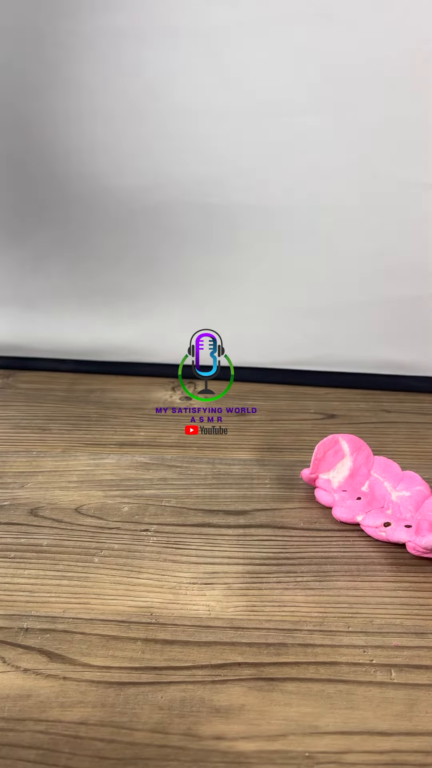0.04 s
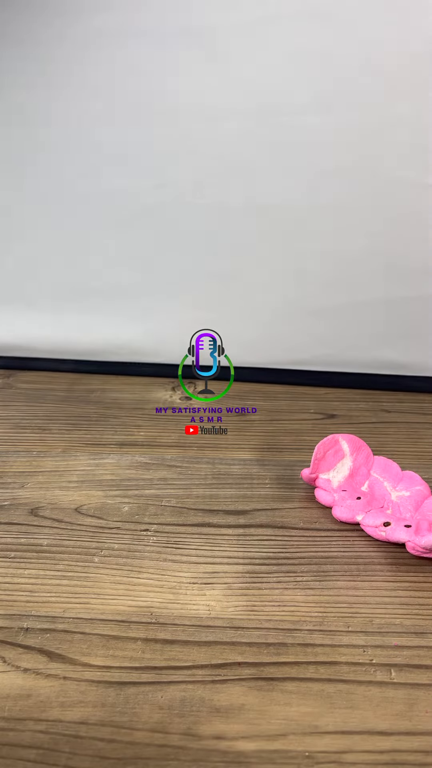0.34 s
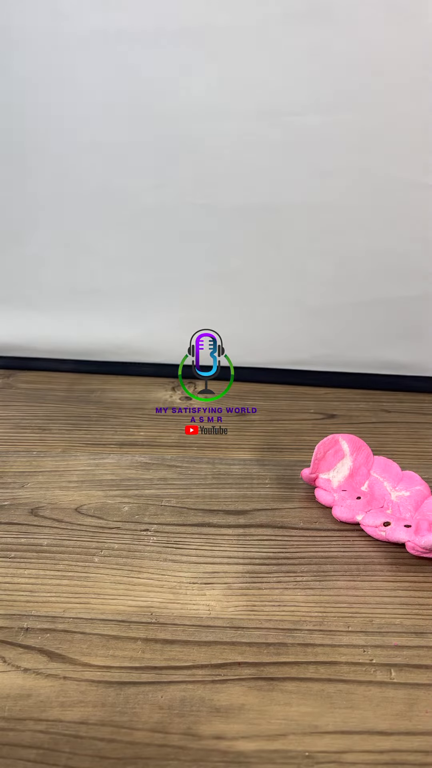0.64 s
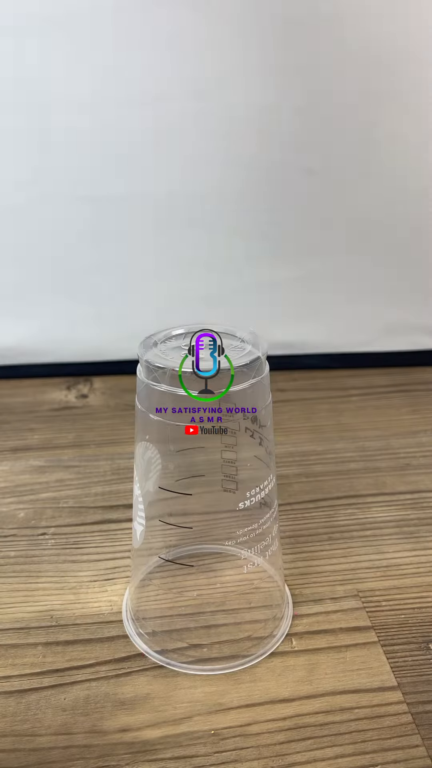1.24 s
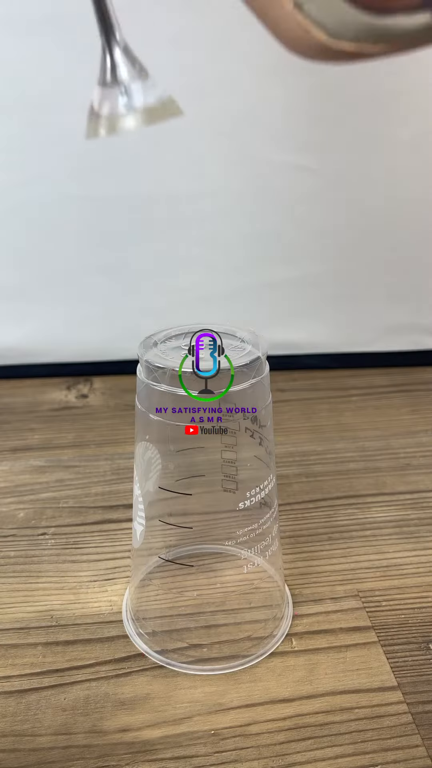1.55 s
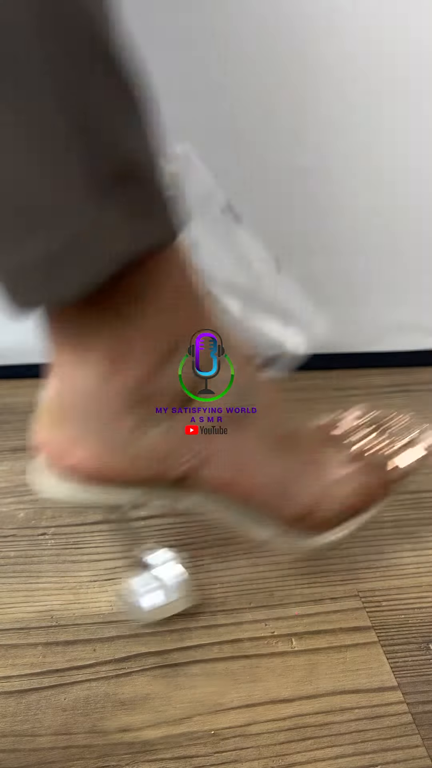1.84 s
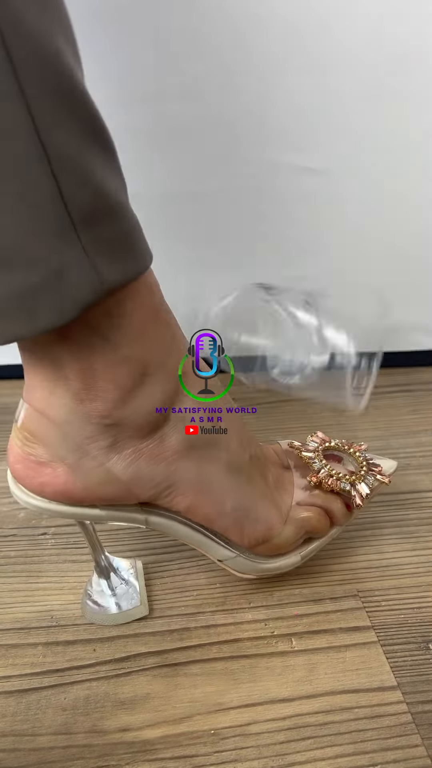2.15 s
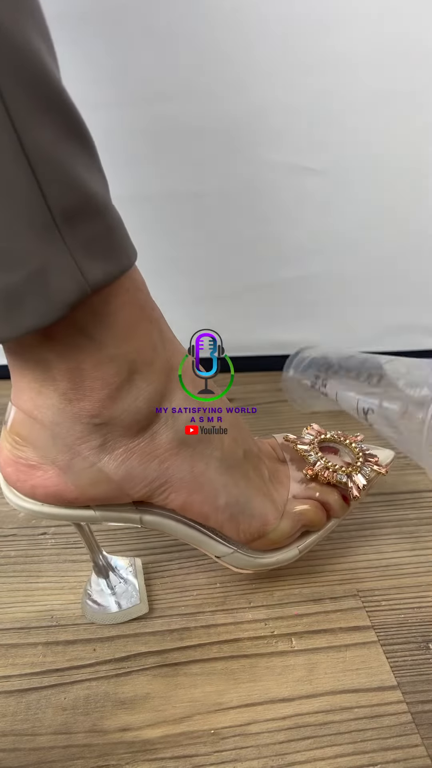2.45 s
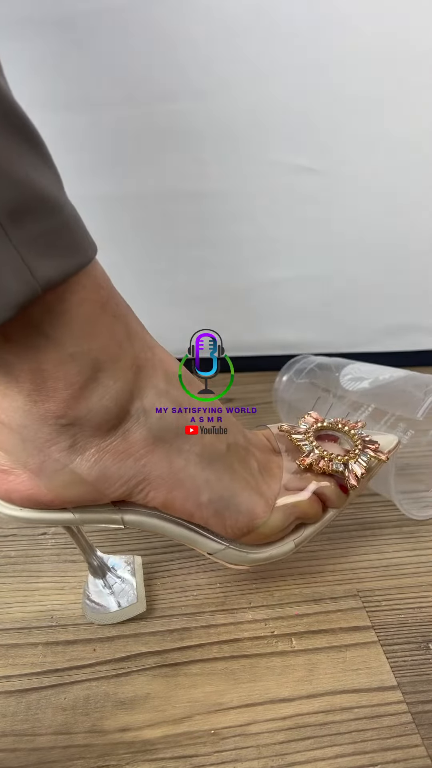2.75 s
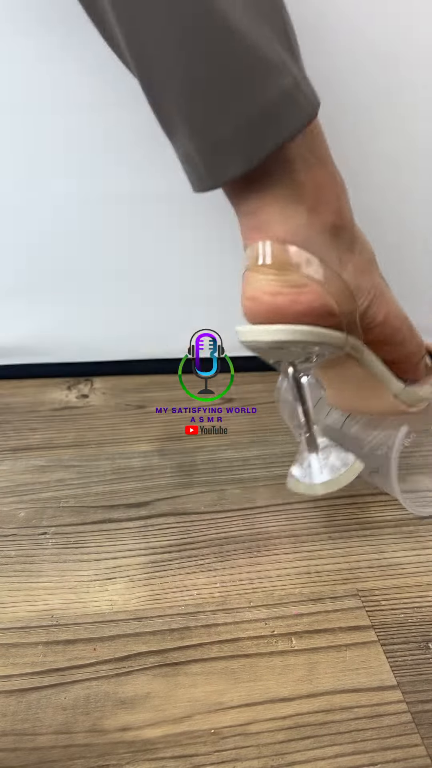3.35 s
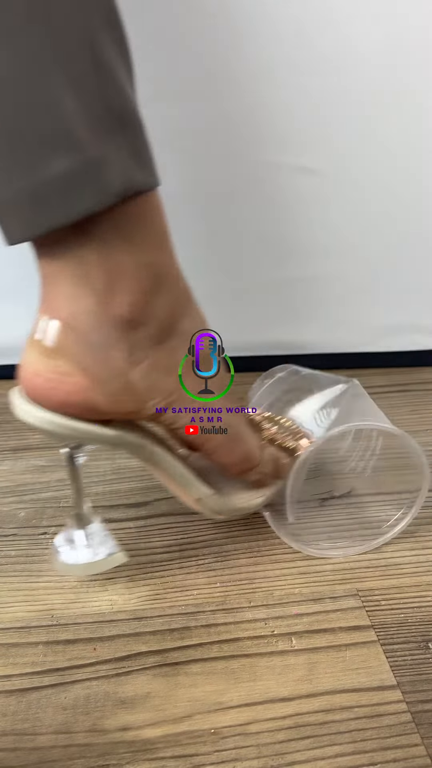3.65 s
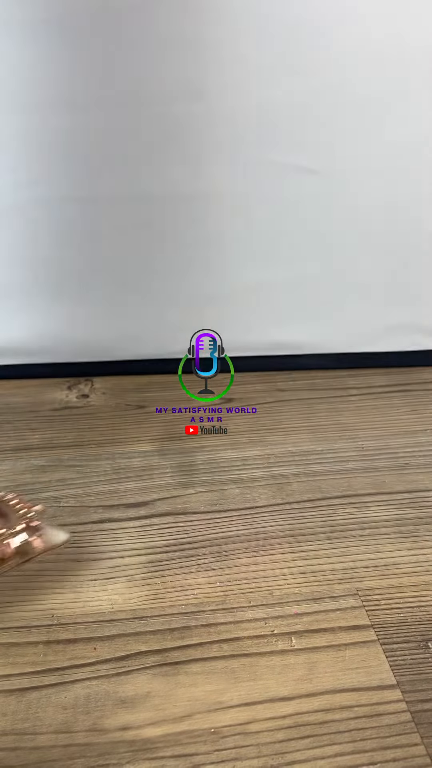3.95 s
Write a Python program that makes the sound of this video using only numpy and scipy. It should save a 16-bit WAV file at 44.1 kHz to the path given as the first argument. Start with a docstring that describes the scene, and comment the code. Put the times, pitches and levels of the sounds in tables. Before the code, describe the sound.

A thin plastic cup crunches under a high heel, bounces away and is crushed again.

```python
"""A high heel stamps on an upturned thin plastic cup on a wooden floor, close to a phone in a small room.
First come a faint rustle, ticks and soft steps; the sound drops out once with a click. Then the cup
buckles in a rush of hollow snaps and crinkles, the loudest overloading the microphone. It springs away,
bounces and rattles to rest. Last, the shoe scuffs and shoves it along the floor, the rim sticking and
slipping on the boards, and crushes it again, the pinched plastic squeaking under the sole."""
import sys
import numpy as np
from scipy import signal
from scipy.fft import rfft, irfft, next_fast_len
from scipy.io import wavfile
from scipy.ndimage import map_coordinates

SR = 44100
rng = np.random.default_rng(int(sys.argv[2]) if len(sys.argv) > 2 else 0)


def transcribe(signal):
    """Save signal, clipped to [-1, 1], as a 16-bit WAV file at the path in sys.argv[1]."""
    frames = np.atleast_2d(signal).T
    limited = np.clip(frames, -1, 1)
    pcm = np.round(limited * 32767).astype(np.int16)
    wavfile.write(sys.argv[1], SR, pcm)


N = 176400

# tone of a bare impact, for blows and creases alike: freq_hz, gain_db
IMPACT_COLOUR = [(50, -3.5), (300, 6.5), (650, 2.5), (1400, 12.5), (2000, -3), (2700, 5.5), (5000, -0.5),
                 (7300, -6), (9500, -18.5), (15500, -35)]


def amp(db):
    return 10 ** (np.asarray(db) / 20)


def unit(x):
    return x / np.sqrt(np.mean(x ** 2) + 1e-20)


def decay(t, t60):
    return np.exp(-np.log(1000) * t / t60)


def along(points, hz):
    """Read (freq_hz, value) points on a log frequency axis."""
    freqs, values = np.transpose(points)
    return np.interp(np.log(hz + 1), np.log(freqs + 1), values)


def curves(rows):
    """One fader curve in dB for each column after the time, silent before the first row."""
    times, *columns = np.transpose(rows)
    return [np.interp(np.arange(N) / SR, times, column, left=-120) for column in columns]


def coloured(x, colour):
    """Equalise x with (freq_hz, gain_db) points, at rms 1."""
    size = next_fast_len(len(x) + 4096)
    gain = amp(along(colour, np.fft.rfftfreq(size, 1 / SR)))
    return unit(irfft(rfft(x, size) * gain, size)[:len(x)])


def add(track, start_s, sound):
    part = track[round(start_s * SR):][:len(sound)]
    part += sound[:len(part)]


def wobble(per_s, size=N):
    """A smooth curve through so many random values a second."""
    return map_coordinates(rng.standard_normal(size // 40), [np.arange(size) * per_s / SR], mode='mirror')


def jerks(per_s, scatter_db):
    """Tiny impulses of uneven size at random moments, at rms 1."""
    moments = rng.random(N) < per_s / SR
    sizes = amp(scatter_db * rng.standard_normal(N))
    return unit(moments * sizes * np.sign(rng.standard_normal(N)))


def in_room(x):
    """Add early echoes from floor and wall, and a fresh diffuse tail that dies faster in the treble."""
    # reverb time of the room: freq_hz, t60_s
    tail_t60 = [(100, 0.66), (400, 0.5), (1500, 0.32), (5000, 0.36), (9000, 0.17), (15000, 0.19)]
    # tone of the tail: freq_hz, gain_db
    tail_colour = [(60, -3.5), (250, -7.5), (700, -2.5), (2000, -1), (6000, -2.5), (14000, 1)]
    tail_db, build_s, echo_db = -12.5, 0.0014, -21.5
    hz, t, spectrum = signal.stft(rng.standard_normal(SR // 2), SR, nperseg=256)
    spectrum = spectrum * decay(t, along(tail_t60, hz)[:, None]) * amp(along(tail_colour, hz))[:, None]
    tail = signal.istft(spectrum, SR, nperseg=256)[1]
    tail *= 1 - np.exp(-np.arange(len(tail)) / SR / build_s)
    response = amp(tail_db) * tail / np.linalg.norm(tail)
    echoes_s = rng.uniform(.002, .018, size=6)
    response[(echoes_s * SR).astype(int)] += amp(echo_db)
    response[0] += 1  # direct sound
    return signal.fftconvolve(x, response)


def background():
    """Quiet room tone and a faint, fluttering rustle with a dull rubbing in it."""
    # low room tone: freq_hz, gain_db
    room_colour = [(24, -19), (60, 0), (556, -10.5), (16000, -33)]
    # swell of the rustle: time_s, hiss_db, rub_db
    rustle_levels = [(0, -52, -64.5), (.35, -66.5, -64), (.58, -62.5, -60), (.85, -71, -77)]
    # tone of its hiss: freq_hz, gain_db
    hiss_colour = [(300, -16.5), (3000, 3), (14000, -18.5)]
    # tone of its rubbing: freq_hz, gain_db
    rub_colour = [(900, -9.5), (1400, 3), (9000, -34)]
    room_tone_db, flutter_db = -57.5, 2
    out = amp(room_tone_db) * coloured(rng.standard_normal(N), room_colour)
    for level_db, colour in zip(curves(rustle_levels), (hiss_colour, rub_colour)):
        out += amp(level_db + flutter_db * wobble(per_s=68)) * coloured(rng.standard_normal(N), colour)
    return out


def ticks():
    """The shoe and the settling plastic tick faintly, each tick one broad, quickly fading resonance."""
    # small ticks: start_s, level_db, pitch_hz, t60_s
    tick_cues = [(.145, -43, 1260, 0.059), (.287, -44, 2900, 0.024), (1.441, -33, 2700, .026)]
    width = 0.053  # share of the pitch
    out, t = np.zeros(N), np.arange(SR // 10) / SR
    for start_s, level_db, pitch_hz, t60_s in tick_cues:
        ring = signal.lfilter(*signal.iirpeak(pitch_hz, 1 / width, SR), rng.standard_normal(len(t)))
        add(out, start_s, amp(level_db) * unit(ring) * decay(t, t60_s))
    return in_room(out)[:N]


def blows(cues, ring=None):
    """Each blow is a noise burst plus an optional ring; the point of contact weights five bands."""
    # bands of a blow, from thud up to sparkle: low_hz, high_hz
    bands = [(35, 250), (280, 850), (900, 2400), (2400, 5500), (5500, 16000)]
    attack_s, head_s = 0.00045, .007  # a band's level is set over the head of the blow
    out, t = np.zeros(N), np.arange(SR // 5) / SR
    filters = [signal.butter(3, band, 'bandpass', fs=SR, output='sos') for band in bands]
    for start_s, *levels_db, t60_s in cues:
        hit = coloured(rng.standard_normal(len(t)), IMPACT_COLOUR) * decay(t, t60_s)
        if ring:
            hit += ring(t, start_s)
        hit *= 1 - np.exp(-t / attack_s)
        parts = [signal.sosfilt(sos, hit) for sos in filters]
        blow = sum(amp(db) * part / np.std(part[:int(head_s * SR)]) for db, part in zip(levels_db, parts))
        add(out, start_s, in_room(blow))
    return out


def footsteps():
    """The shoe meets the wooden floor in dull knocks with no ring."""
    # footfalls: start_s, thud_db, body_db, wood_db, click_db, sparkle_db, burst_t60_s
    footfalls = [(.878, -50.5, -47.5, -49.5, -52, -57, 0.24), (1.207, -57, -53.5, -45.5, -50, -52, 0.052),
                 (1.9195, -13, -17, -15, -20.5, -28.5, 0.0098), (2.73, -49, -44, -42.5, -46.5, -54.5, 0.11)]
    return blows(footfalls)


def cup_ring(t, start_s):
    """Three steady low modes weighted by the contact; the flexing wall blurs and retunes the others."""
    # modes of the cup: pitch_hz, level_db, t60_s
    modes = [(370.3, -0.5, .11), (532, 3, 0.048), (720.5, 2, 0.052), (888, -14, .021), (1189, -6.5, 0.029),
             (1380, -1, 0.018), (1647, -3.5, 0.029), (2370, -6, 0.012), (2880, -5.5, 0.022),
             (3930, -4, 0.027), (5118, -7.5, 0.018), (6660, -12.5, .01)]
    # how the cup is held or lands weights its low modes: from_s, first_db, second_db, third_db
    contacts = [(1.7, -21, 4.5, -15), (1.81, -19.5, -2, -1.5), (2.1, 1, -4.5, -3.5),
                (2.3, -5.5, -0.5, -0.5)]
    ring_db, scatter_db = -10.5, 3  # against the burst; change from snap to snap
    low_detune, wall_detune, wall_width = 0.012, .07, .03  # shares of the pitch
    contact_db = [row[1:] for row in contacts if row[0] <= start_s][-1]
    ring = np.zeros(len(t))
    for k, (pitch_hz, level_db, t60_s) in enumerate(modes):
        if k < len(contact_db):
            level_db += contact_db[k]
            detune, blur = low_detune, 0
        else:
            detune = wall_detune
            blur = np.cumsum(rng.standard_normal(len(t))) * np.sqrt(2 * np.pi * wall_width * pitch_hz / SR)
        phase = 2 * np.pi * pitch_hz * (1 + detune * rng.normal()) * t + blur
        ring += (-1) ** k * amp(level_db + scatter_db * rng.normal()) * decay(t, t60_s) * np.sin(phase)
    return amp(ring_db) * ring


def cup_snaps():
    """The cup buckles, bounces and is crushed again; every snap and knock sets it ringing."""
    # snaps and knocks: start_s, thud_db, hollow_db, wall_db, crack_db, sparkle_db, burst_t60_s
    snaps = [(1.7735, -33, -9, -14.5, -25, -33, 0.017), (1.7775, -24, -22, -23, -28, -39, 0.098),
             (1.797, -17, -9, -7, -18, -28, .042), (1.8005, -15, -8, -15, -8, -26, 0.016),
             (1.817, -36, -12, -15, -18, -26, 0.052), (1.828, -28, -14, -11.5, -10, -11.5, 0.015),
             (1.844, -25, -2.5, 3, -13.5, -20.5, 0.018), (1.851, -18.5, -2.5, -2, -3, -14, 0.017),
             (1.859, -32.5, -12, -7, -6.5, -13, 0.0098), (1.871, -26.5, -8, -14, -26, -31.5, .053),
             (1.881, -32.5, -16, -17.5, -25.5, -32, 0.017), (2.002, -27, -29, -34.5, -39.5, -48, .011),
             (2.081, -45, -44, -40, -44.5, -56.5, .013), (2.181, -38, -8, -11.5, -24.5, -34, 0.013),
             (2.2142, -21.5, -15, -8.5, -12.5, -20.5, 0.016), (2.339, -35.5, -24, -28.5, -19.5, -23, 0.019),
             (2.382, -31, -13, -18, -17.5, -31, 0.017), (2.429, -40, -23, -25, -38, -49, 0.022),
             (2.447, -34, -29, -20.5, -27, -31.5, 0.032), (2.459, -35, -23.5, -23.5, -28, -34.5, 0.014),
             (2.505, -43, -23, -23, -31.5, -36, 0.028), (2.536, -48, -21.5, -26, -34.5, -40.5, 0.03),
             (2.557, -45, -28, -37, -40, -48, .02), (2.572, -50, -29.5, -33, -41.5, -46, 0.053),
             (2.6, -40, -33.5, -44, -49, -63, 0.034), (2.634, -49, -44, -48.5, -57, -63.5, .03),
             (3.3335, -55, -54, -37.5, -40.5, -53, 0.0098), (3.355, -45, -25, -38, -48, -51, 0.096),
             (3.394, -25, -24.5, -42, -34.5, -46.5, 0.0078), (3.503, -30, -16, -12.5, -22, -23, 0.015),
             (3.552, -45, -25, -18.5, -29, -37, 0.02), (3.672, -64, -48, -25.5, -20.5, -21.5, .018),
             (3.7215, -30, -24, -16.5, -12.5, -23, 0.029), (3.738, -20, -12, -21, -22, -29, .014),
             (3.753, -19.5, -12, -12, -14.5, -24, 0.031), (3.761, -23, -2, -8.5, -12.5, -20, 0.04),
             (3.766, -17, -4, -15.5, -20, -33, 0.01), (3.8295, -42, -13.5, -15, -17.5, -26.5, 0.018),
             (3.841, -51, -26, -31, -27, -34, 0.0077), (3.989, -41, -15, -17.5, -18.5, -28.5, .015)]
    return blows(snaps, ring=cup_ring)


def crinkle():
    """Small creases snap all through the stamp as the wall folds."""
    # swell of the crinkling: time_s, level_db
    crinkle_levels = [(1.776, -31.5), (1.79, -22.5), (1.81, -14.5), (1.865, -18.5), (1.89, -28),
                      (1.935, -35), (1.97, -49), (2.06, -64.5)]
    level_db, = curves(crinkle_levels)
    creases = jerks(per_s=1400, scatter_db=5)
    return in_room(amp(level_db) * coloured(creases, IMPACT_COLOUR))[:N]


def slide():
    """The rim sticks and slips on the boards in tiny uneven jerks, under a juddering pressure."""
    # the cup rolling, then sliding under the shoe: time_s, hiss_db, rumble_db
    slide_levels = [(2.34, -51, -29), (2.42, -58, -38), (2.57, -53, -41.5), (2.7, -87, -73.5),
                    (3.345, -90.5, -100), (3.36, -48.5, -36), (3.412, -45, -33.5), (3.455, -32.5, -30),
                    (3.486, -38.5, -27.5), (3.54, -36, -29.5), (3.585, -35.5, -35), (3.628, -43, -37.5),
                    (3.655, -38, -34.5), (3.688, -22, -31.5), (3.712, -24.5, -30), (3.732, -21, -18),
                    (3.775, -74, -47), (3.81, -75, -56), (3.872, -56, -38), (3.904, -36, -38.5),
                    (3.945, -34.5, -35), (4.0, -29, -30.5)]
    # hiss of the rim: freq_hz, gain_db
    rim_colour = [(880, -26), (1500, -1), (2500, 4), (5120, 1.5), (8570, -15), (16000, -53)]
    # rumble of the body: freq_hz, gain_db
    body_colour = [(90, -18), (170, -6.5), (400, 0.5), (1200, -3.5), (5000, -41.5)]
    judder_db, rub_db = 2.5, -3.5
    hiss_db, rumble_db = curves(slide_levels)
    pressure = amp(judder_db * wobble(per_s=90))
    slips = jerks(per_s=700, scatter_db=2)
    friction = pressure * (slips + amp(rub_db) * rng.standard_normal(N))
    hiss = amp(hiss_db) * coloured(friction, rim_colour)
    rumble = amp(rumble_db) * coloured(friction, body_colour)
    return in_room(hiss + rumble)[:N]


def scuff():
    """The sole drags fine, bright scratches over the boards as the foot moves off."""
    # two quick strokes: time_s, level_db
    scuff_levels = [(3.365, -63), (3.378, -38), (3.41, -57), (3.43, -33), (3.48, -59)]
    # tone of the scratches: freq_hz, gain_db
    scuff_colour = [(2000, -21), (5000, -2), (7000, 0), (10000, -11.5), (13500, -22), (16000, -41)]
    level_db, = curves(scuff_levels)
    scratches = jerks(per_s=2000, scatter_db=6)
    return in_room(amp(level_db) * coloured(scratches, scuff_colour))[:N]


def squeaks():
    """Pinched plastic sticks and slips about a thousand times a second, at an unsteady, sagging rate."""
    # squeaks under the sole: start_s, length_s, level_db, pitch_hz
    squeak_cues = [(3.685, .008, -24, 1146), (3.695, .016, -24, 1080), (3.715, 0.029, -23, 816),
                   (3.8788, 0.014, -24, 855), (3.9115, 0.014, -20, 1108), (3.925, .008, -25, 1090),
                   (3.939, 0.023, -23, 1012), (3.963, .015, -22.5, 1040)]
    # tone of the squeaking wall: freq_hz, gain_db
    wall_colour = [(500, -8), (2300, -6), (4300, 2.5), (7000, -6), (16000, -36.5)]
    sag_per_s, wander = 2.97, 0.023  # shares of the pitch
    jitter_cycles, fade_s = 0.026, 0.00095
    out, t = np.zeros(N), np.arange(SR // 10) / SR
    for start_s, length_s, level_db, pitch_hz in squeak_cues:
        slip_hz = pitch_hz * (1 - sag_per_s * t + wander * wobble(per_s=196, size=len(t)))
        cycles = np.cumsum(slip_hz) / SR
        nearest = np.round(cycles).astype(int)
        late = jitter_cycles * rng.standard_normal(len(t))[nearest]
        slips = np.sinc((cycles - nearest - late) * SR / pitch_hz)  # one sharp pulse a cycle
        gate = np.clip(np.minimum(t, length_s - t) / fade_s, 0, 1)
        add(out, start_s, amp(level_db) * coloured(slips, wall_colour) * gate)
    return in_room(out)[:N]


def scene():
    """Everything reaches one microphone, the same in both channels."""
    mono = cup_snaps() + footsteps() + crinkle() + slide() + scuff() + squeaks() + ticks() + background()
    return np.array([mono, mono])


def record(dry):
    """The signal rides on a small offset, drops out once with a soft click, clips and is band-limited."""
    offset, dropout_s, gap_s, return_s = -.03, 1.0986, .019, .009
    clip_hardness, top_hz = 6, 16200
    t = np.arange(N) / SR - dropout_s
    gate = np.where(t < 0, 1, np.clip((t - gap_s) / return_s, 0, 1))
    gated = (dry + offset) * gate  # cutting the offset makes the click
    clipped = gated / (1 + np.abs(gated) ** clip_hardness) ** (1 / clip_hardness)
    return signal.fftconvolve(clipped, signal.firwin(255, top_hz, fs=SR)[None], 'same', axes=1)


dry = scene()
out = record(dry)
transcribe(out)
```